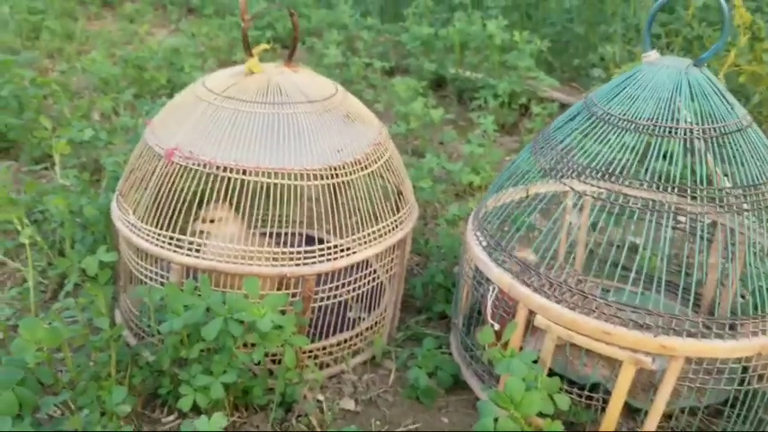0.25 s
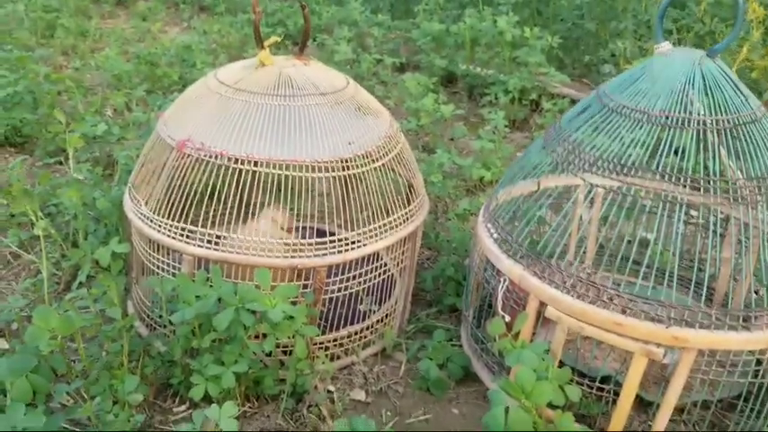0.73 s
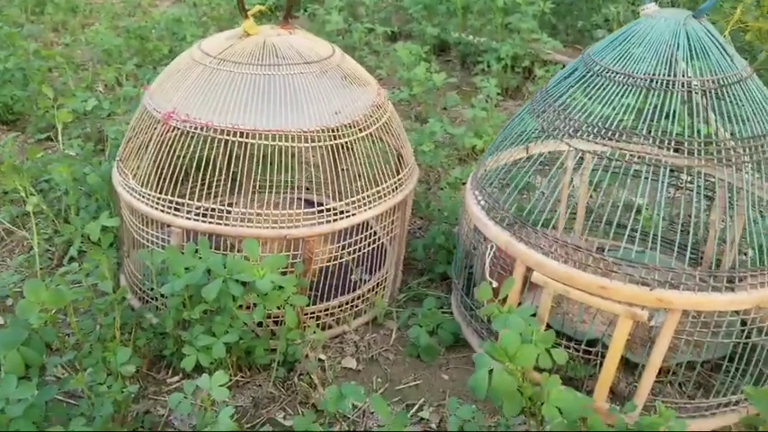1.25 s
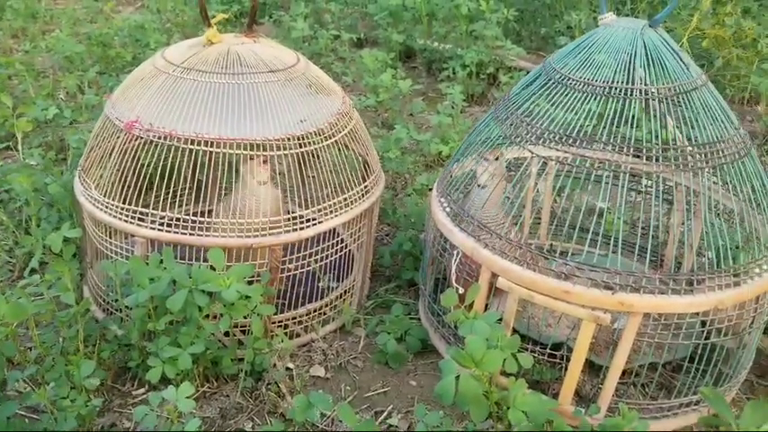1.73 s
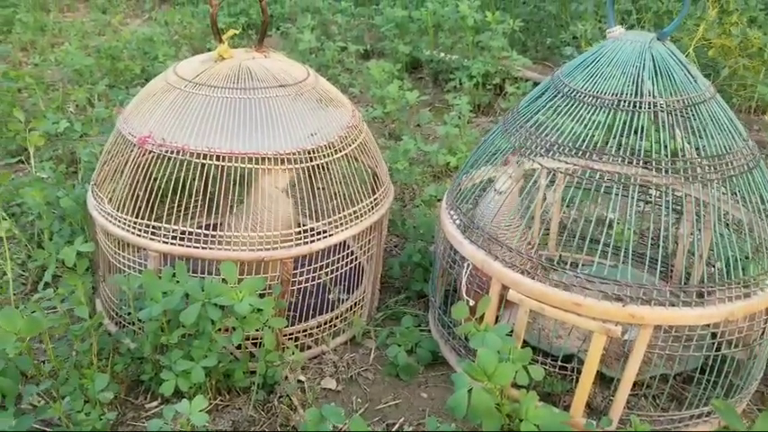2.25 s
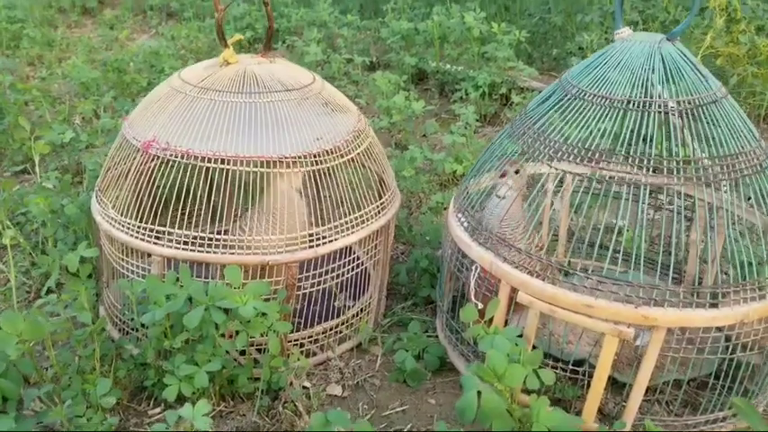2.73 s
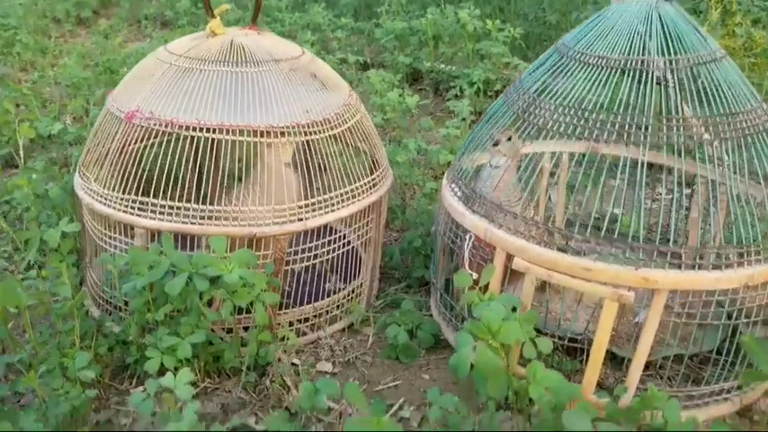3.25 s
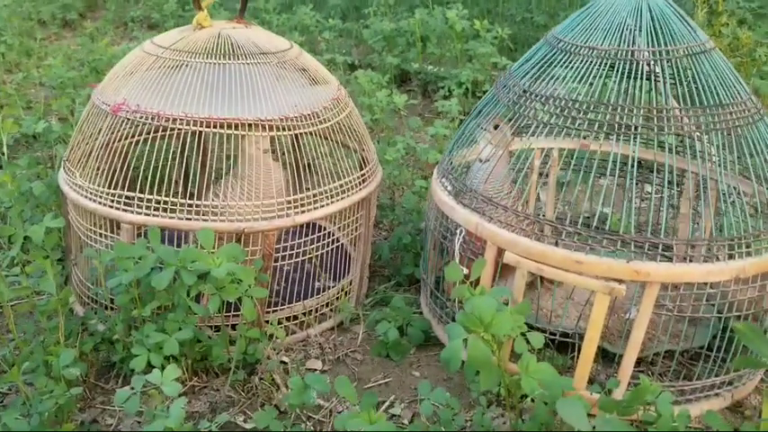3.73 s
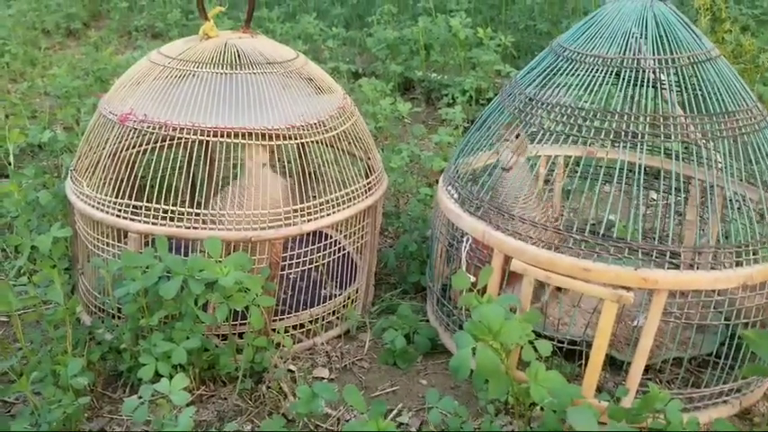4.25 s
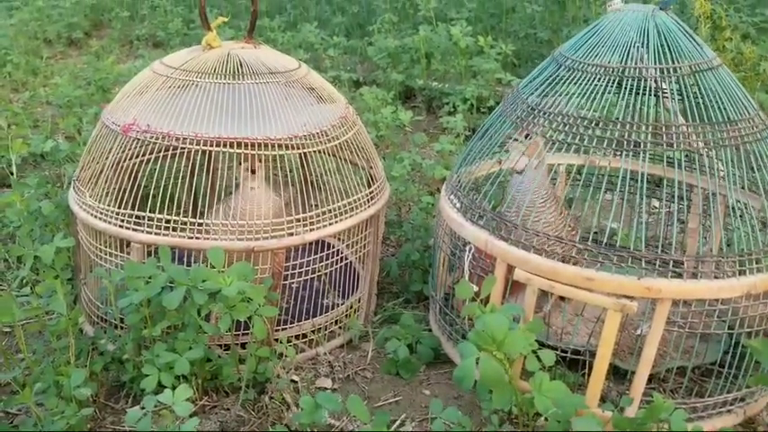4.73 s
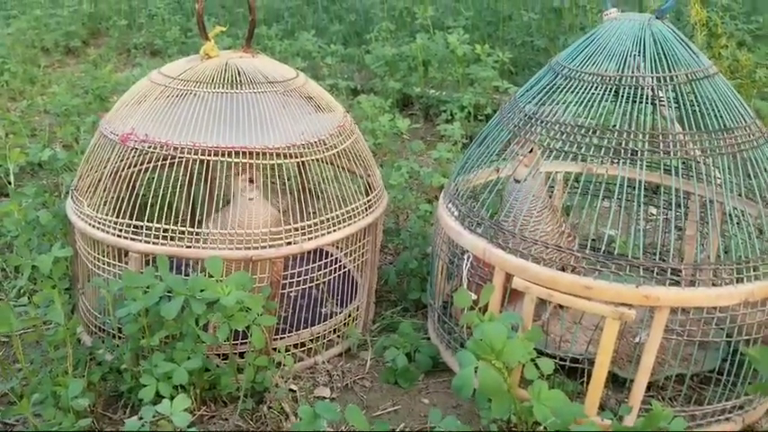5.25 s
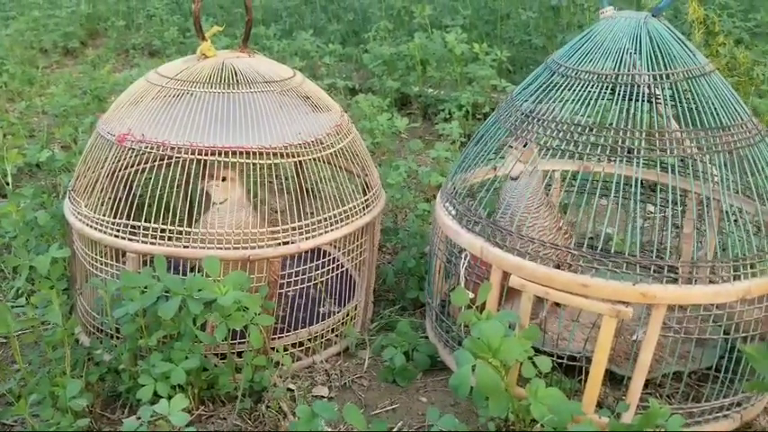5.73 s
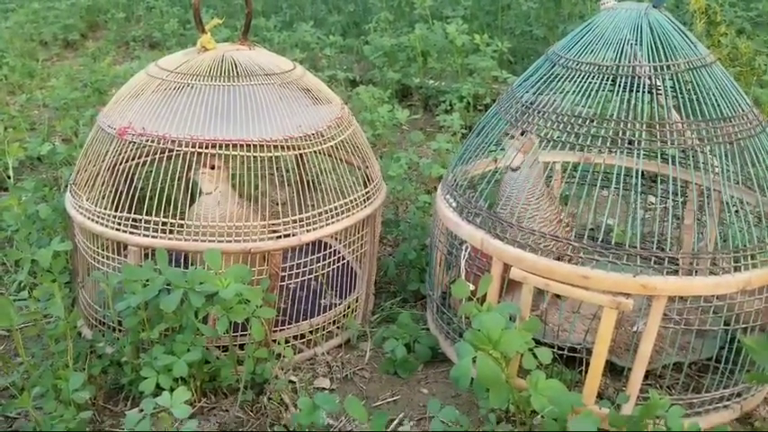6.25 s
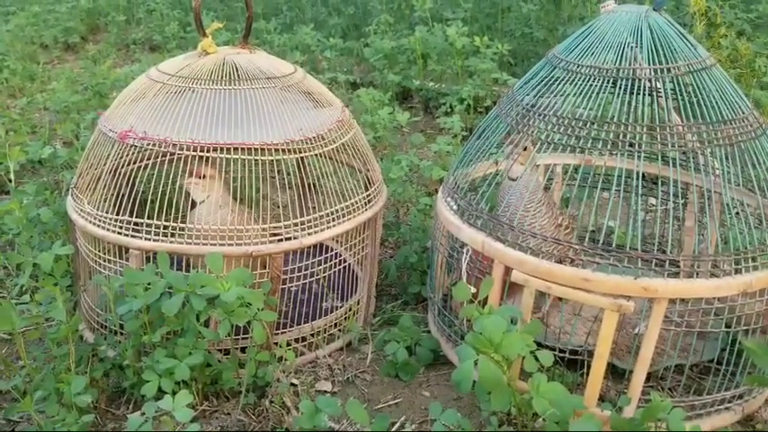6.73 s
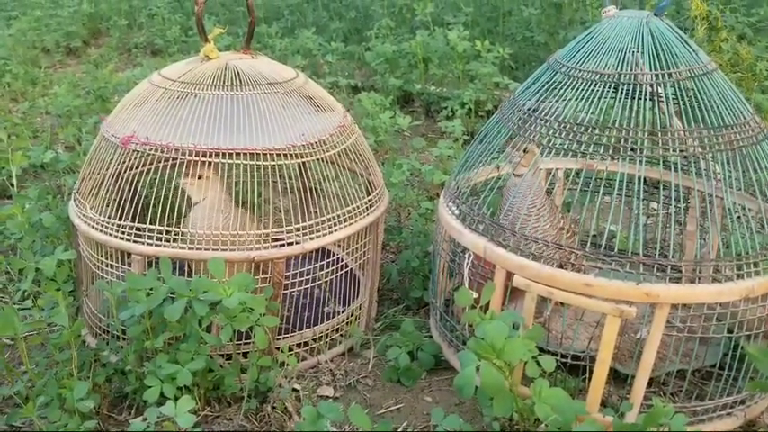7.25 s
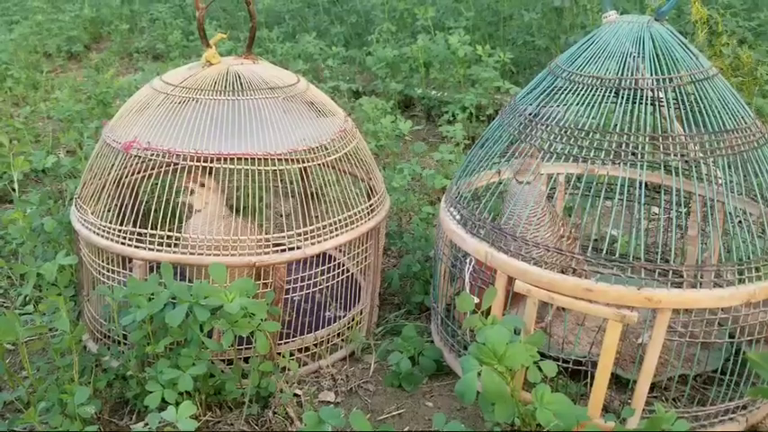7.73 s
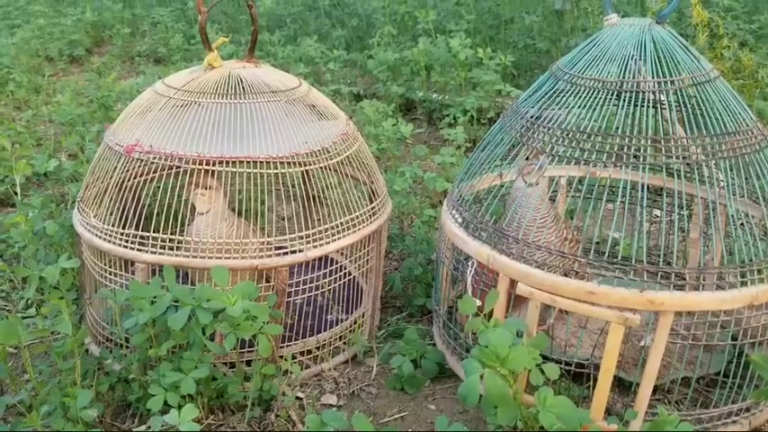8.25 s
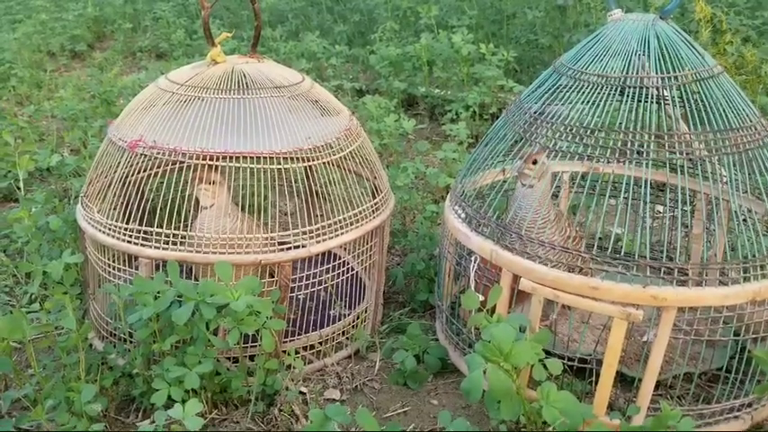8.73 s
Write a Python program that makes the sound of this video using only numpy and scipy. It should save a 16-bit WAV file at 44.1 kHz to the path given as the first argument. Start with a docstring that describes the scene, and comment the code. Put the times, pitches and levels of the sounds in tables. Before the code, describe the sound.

Soft knocks and whines open over a faint low rumble outdoors. Game birds in cages then break into a dense, shrill chorus near the microphone: sharp ringing notes, cracked falling whistles and rapid raspy clucks, with a high squeal recurring between them. The rhythm holds for several seconds before easing to a few separate whistles and squeals. The field gives back a slight echo.

```python
"""Ringing 'tee' notes, broken falling 'tar' notes and runs of hoarse chucks interlock, close by:
francolins calling from two cages in a field, joined by a thin breathy squeal. A bird's vocal
membrane whistles when it swings regularly and rasps when it swings chaotically.
Soft whines, dull knocks, low rumble and hiss lie underneath; the field returns a faint echo."""
import sys
import numpy as np
from scipy import signal
from scipy.fft import rfft, irfft, next_fast_len
from scipy.io import wavfile

SR = 44100
rng = np.random.default_rng(int(sys.argv[2]) if len(sys.argv) > 2 else 0)


def persist_wave(psi):
    """Save psi, clipped to +-1, as 16-bit WAV."""
    counts = np.round(np.clip(psi, -1, 1) * 32767).astype(np.int16)
    wavfile.write(sys.argv[1], SR, np.atleast_2d(counts).T)


N = 396018

# low background over time: time_s, bass_db, rumble_db
LOW_LEVELS = [(0.0, -50.5, -49.5), (1.1, -48.5, -59), (1.85, -60.5, -62), (2.37, -65.5, -69),
              (3.2, -60.5, -60.5), (3.62, -70.5, -68.5), (7.05, -74, -64), (7.5, -62, -62.5),
              (7.68, -62, -61.5), (8.9, -57.5, -61.5), (8.98, -65, -61)]
# background noise spectra: freq_hz, gain_db
BASS_SPECTRUM = [(20, -16), (38, -13.5), (52, 2.5), (75, -7.5), (130, -2.5), (200, -7), (400, -37),
                 (2000, -70.5)]
RUMBLE_SPECTRUM = [(20, -23.5), (80, -8.5), (140, -3.5), (240, 2), (330, -4), (450, -6.5), (700, -21.5),
                   (1500, -27), (3000, -36), (8000, -78)]
HISS_SPECTRUM = [(200, -6.5), (900, -2.5), (1600, 1.5), (2600, -4.5), (6000, -9), (7800, -2), (8600, -7.5),
                 (9500, -12), (12200, -17), (15500, -24.5)]
# hum lines: freq_hz, level_re_bass_db
HUM_LINES = [(52, -2.5), (104, 0)]
# echo decay: freq_hz, t60_s
FIELD_DECAY = [(300, .3), (1500, 1), (3000, 0.32), (6000, 0.53), (14000, 0.089)]
# double knocks: start_s, second_after_s, peak_db
KNOCK_PAIRS = [(.218, 0.027, -22), (.324, 0.02, -19.5), (.501, 0.0092, -22), (.694, 0.014, -23),
               (.748, 0.026, -24.5), (0.837, .011, -26), (1.059, 0.014, -24), (1.207, 0.019, -25),
               (2.952, 0.027, -30.5), (3.051, 0.032, -28.5), (3.206, 0.049, -29)]
# spells of fainter knocks: start_s, end_s
PATTER_SPELLS = [(.1, 1.2), (2.9, 3.35)]
# knock spectrum: freq_hz, gain_db
KNOCK_SPECTRUM = [(40, -13.5), (130, 0.5), (350, -3.5), (650, -5.5), (1100, -19), (2500, -32.5),
                  (6000, -34), (12000, -68)]
# nasal whines: start_s, end_s, pitch_hz, level_db, noise_share
WHINE_NOTES = [(.02, .39, 466, -41, .45), (1.02, 1.38, 385, -43, .7)]
# falling peeps: start_s, length_s, from_hz, to_hz, level_db
PEEP_NOTES = [(.695, .075, 2000, 1450, -50), (.80, .03, 2300, 1750, -55), (.77, .06, 1300, 900, -59),
              (8.37, .23, 2150, 1980, -63)]
# squeals: start_s, length_s, handover_after_s, pitch_hz, lower_db, upper_db, pan_db, bump_db
SQUEAL_NOTES = [(1.155, .15, 0.13, 3860, -15, -23.5, 10, -30.5),
                (2.08, 0.14, .022, 3880, -29.5, -28, -9, -40),
                (2.775, 0.17, 0.044, 3900, -22.5, -26, 0.5, -47),
                (3.42, .168, 0.11, 3974, -28, -31.5, 4.5, -48),
                (4.005, 0.18, .062, 4030, -28, -33.5, 4.5, -55.5),
                (4.579, 0.18, 0.075, 4020, -28, -28.5, 1, -58),
                (5.145, 0.18, 0.057, 3980, -25, -26, 5, -51.5),
                (5.821, 0.17, 0.048, 3990, -26, -29, -1, -54),
                (6.449, 0.17, .041, 4110, -22, -33.5, -3, -54),
                (6.985, 0.21, 0.16, 4018, -19.5, -29.5, 2.5, -50.5),
                (7.609, .208, .055, 4020, -20.5, -20.5, -5, -39),
                (8.203, 0.18, 0.06, 4044, -20, -23.5, -6.5, -49.5),
                (8.798, 0.19, .062, 4053, -20.5, -23, -4.5, -36.5)]
# vocal tract filters: freq_hz, gain_db
WHINE_SPECTRUM = [(300, -21), (800, -14), (1100, -16), (1450, -2), (1850, -7), (2600, -20.5), (4500, -22),
                  (6000, -18), (7000, -28.5), (11000, -17), (15000, -45.5)]
BEAK_OPEN = [(200, -52), (500, -20), (780, -24.5), (1100, -13.5), (1450, -12), (2000, -7.5), (2850, 1.5),
             (3600, -0.5), (4400, -7.5), (5800, -13.5), (7200, -21), (10500, -20.5), (15000, -25.5)]
BEAK_HALF_SHUT = [(200, -30.5), (500, -20), (780, -26), (1150, -13.5), (1550, 4), (2200, -17), (3000, -18),
                  (4300, -39.5), (5500, -18), (7500, -33), (15000, -31)]
SQUEAL_GAP = [(300, -25), (1000, -24.5), (1800, -16), (2600, -22), (3400, -21), (4000, 2.5),
              (4500, -2), (5200, -3), (6200, -17), (7500, -24), (12000, -22), (15500, -22.5)]
# chuck runs: start_s, count, spacing_ratio, top_hz, level_db, closing_chucks, last_fade_db
CHUCK_SERIES = [(1.733, 4, 1, 2485, -24.5, 1.05, -10.5), (2.48, 3, 0.97, 2897, -22.5, 1.6, -15),
                (3.021, 3, 1, 2962, -21, 1.72, -3), (3.565, 3, 1.04, 2965, -20.5, 1.59, -4.5),
                (4.13, 3, 1.005, 2957, -21, 1.58, -2.5), (4.675, 6, 1.005, 2928, -20.5, 1.65, -4),
                (5.708, 2, 0.98, 2780, -23, 1.47, 0), (6.262, 7, 0.99, 2890, -21, 1.5, -10.5)]
# broken notes: lock_s, stretch_ratio, pitch_hz, level_db, harmonic2_db
TAR_NOTES = [(1.471, 0.97, 2594, -15, 0), (2.274, 0.96, 2710, -13, -9), (2.807, 1.033, 2666, -11.5, -12),
             (3.353, 1.0, 2683, -11, -9), (3.922, 1.03, 2685, -11.5, -12), (4.466, 1.0, 2670, -10, -11.5),
             (5.509, 1.042, 2657, -8.5, -15.5), (6.054, 1.075, 2656, -7.5, -15)]
# ringing notes: lock_s, pitch_hz, sag_hz, level_db, harmonic2_db, upper_harmonics_db
TEE_NOTES = [(1.639, 2955, -5, -10, -9.5, -14.5), (2.174, 2968, 18, -13.5, -8.5, -20),
             (2.64, 2985, 9, -13, -7.5, -26), (3.16, 3002, -3.5, -11, -24.5, -18),
             (3.709, 2993, -8.5, -16, -18, -18), (4.273, 2987, 5, -13.5, -20.5, -20.5),
             (4.824, 2998, 6.5, -10.5, -31, -22.5), (5.361, 2980, 1, -8.5, -25.5, -23),
             (5.877, 2962, 45.5, -10, -18.5, -16), (6.428, 2945, 53, -9.5, -22.5, -13.5),
             (7.146, 2928, 30, -13, -15, -14.5), (7.792, 2926, 12, -9.5, -13, -14.5)]
# caller's head position: time_s, turn_fraction
HEAD_TURNS = [(2.6, 0.18), (3.7, 0.12), (4.8, 0.71), (5.9, 0.98), (7.1, 0.99), (7.8, 0.68)]
# microphone port colour: freq_hz, left_minus_right_db
PORT_BALANCE = [(100, -3), (450, -1.5), (1400, 2.5), (2500, 0.5), (4500, -1.5), (6000, -3), (8500, -0.5),
                (12000, 1), (15000, 3.5)]

LOCK_S, RELEASE_S = .003, .008  # a whistle locks in, breaks up


def amp(db):
    return 10 ** (np.asarray(db) / 20)


def unit_rms(x):
    return x / np.sqrt(np.mean(x ** 2) + 1e-20)


def at_freq(points, hz):
    """Interpolate over log frequency."""
    freq_hz, value = np.transpose(points)
    return np.interp(np.log(hz + 1), np.log(freq_hz + 1), value)


def colour(x, spectrum, bright_db=0):
    """Filter by a spectrum plus a treble shelf; rms 1."""
    hz = np.fft.rfftfreq(len(x), 1 / SR)
    shelf_db = bright_db * hz ** 4 / (hz ** 4 + 3280.0 ** 4)
    return unit_rms(irfft(rfft(x) * amp(at_freq(spectrum, hz) + shelf_db), len(x)))


def wobble(n, rate_hz):
    """Smooth random drift; rms 1."""
    size = next_fast_len(n + 4096)
    lowpass = np.exp(-(np.fft.rfftfreq(size, 1 / SR) / rate_hz) ** 2)
    return unit_rms(irfft(rfft(rng.standard_normal(size)) * lowpass, size))[:n]


def stereo_noise(spectrum, spread):
    """Coloured noise, partly shared by both microphones."""
    common = rng.standard_normal(N)
    return np.array([colour(common + spread * rng.standard_normal(N), spectrum) for _ in range(2)])


def gate(t, start_s, end_s, attack_s, release_s):
    return np.clip((t - start_s) / attack_s, 0, 1) * np.clip((end_s - t) / release_s, 0, 1)


def bell(t, centre, width):
    return np.exp(-((t - centre) / width) ** 2)


def phase_rad(hz):
    return 2 * np.pi * np.cumsum(hz) / SR


def place(mix, start_s, sound, pan_db=0, lag_ms=0):
    """Add to the mix; pan_db is left minus right, lag_ms delays the right."""
    size = next_fast_len(len(sound) + 128)
    delay = np.exp(-2j * np.pi * np.fft.rfftfreq(size, 1 / SR) * lag_ms / 1000)
    right = irfft(rfft(sound, size) * delay, size)[:len(sound)]
    part = mix[:, max(round(start_s * SR), 0):][:, :len(sound)]
    part += np.array([sound * amp(pan_db / 2), right * amp(-pan_db / 2)])[:, :part.shape[1]]


def head_turn(time_s, before, after):
    """Blend two values as the bird turns its head."""
    return before + (after - before) * np.interp(time_s, *np.transpose(HEAD_TURNS))


def tone(hz, harmonics_db, jitter, shimmer_db=0):
    """Regular swing: a harmonic stack; overtones shimmer as the head moves."""
    phase = phase_rad(hz * (1 + jitter * wobble(len(hz), 700)))
    stack = 0
    for k, db in enumerate(harmonics_db, 1):
        sway_db = shimmer_db * wobble(len(hz), 22) if k > 1 else 0
        stack += amp(db + sway_db) * np.sin(k * phase) * (k * hz < SR / 2)
    return np.sqrt(2) * stack


def rasp(hz, beak, bright_db, jitter, air, flutter):
    """Chaotic membrane swing: jittered pulses an octave down, air noise, fast flutter."""
    n = len(hz)
    phase = phase_rad(hz / 2 * (1 + jitter * wobble(n, 855)))
    pulses = unit_rms(sum(np.cos(k * phase) for k in range(1, 11)))
    source = pulses + air * rng.standard_normal(n)
    return colour(source * np.exp(flutter * wobble(n, 700)), beak, bright_db)


def background(pan_db=2, hiss_fade_db_per_s=1.17):
    """Bass with a wavering hum, soft rumble, and a thin fading hiss that dips briefly."""
    t = np.arange(N) / SR
    time_s, *levels_db = np.transpose(LOW_LEVELS)
    bass_gain, rumble_gain = (amp(np.interp(t, time_s, db)) for db in levels_db)
    hum = sum(amp(db) * tone(hz * (1 + .013 * wobble(N, 5.3)), [0], 0) for hz, db in HUM_LINES)
    bass = bass_gain * (stereo_noise(BASS_SPECTRUM, 1) + hum) * amp(-2.5)
    rumble = rumble_gain * stereo_noise(RUMBLE_SPECTRUM, 1.5) * amp(2 + 2.9 * wobble(N, 18))
    hiss_db = -56 - hiss_fade_db_per_s * t - 10 * bell(t, 2.3, .5)
    hiss = amp(hiss_db) * stereo_noise(HISS_SPECTRUM, 2.3)
    return (bass + rumble) * amp([[pan_db / 2], [-pan_db / 2]]) + hiss


def field_echo(x, near_db=-21, tail_db=-32):
    """Cage and ground scatter at once; plants and trees return a faint tail."""
    t = np.arange(SR * 3 // 4) / SR
    taps = rng.standard_normal((2, len(t))) * (rng.random((2, len(t))) < .06)
    hz, frame_s, bands = signal.stft(taps, SR, nperseg=256)
    decay = amp(-60 * frame_s / at_freq(FIELD_DECAY, hz)[:, None])
    tail = signal.istft(bands * decay, SR, nperseg=256)[1][:, :len(t)]
    near = taps * np.exp(-t / .0017)
    response = sum(amp(db) * path / np.linalg.norm(path, axis=1, keepdims=True)
                   for db, path in [(near_db, near), (tail_db, tail)])
    return signal.fftconvolve(x, response, axes=1)[:, :N]


def knocks(second_db=-3, patter_per_s=14, patter_db=-36.5):
    """Dead knocks without ring, in pairs amid a fainter patter."""
    out, t = np.zeros((2, N)), np.arange(2048) / SR
    hit_s = t[256]
    blows = []
    for start_s, after_s, db in KNOCK_PAIRS:
        blows += [(start_s, db), (start_s + after_s, db + second_db)]
    for start_s, end_s in PATTER_SPELLS:
        count = round(patter_per_s * (end_s - start_s))
        blows += [(at_s, patter_db) for at_s in rng.uniform(start_s, end_s, count)]
    for start_s, db in blows:
        scatter = .088 * rng.standard_normal(len(t)) * (t > hit_s) * np.exp(-t / .012)
        knock = colour((t == hit_s) + scatter, KNOCK_SPECTRUM)
        place(out, start_s - hit_s, amp(db) * knock / abs(knock).max(), pan_db=7, lag_ms=.5)
    return out


def bumps(lead_s=.013):
    """A soft, low, falling bump just before each squeal."""
    out, t = np.zeros((2, N)), np.arange(2048) / SR
    hz = 130 + 260 * np.exp(-t / .014)
    swell = np.sin(np.pi * np.sqrt(t / t[-1])) ** 3
    for start_s, *_, db in SQUEAL_NOTES:
        place(out, start_s - lead_s, amp(db) * swell * tone(hz, [0, -17], .068), pan_db=2, lag_ms=.4)
    return out


def peeps():
    """Faint falling peeps."""
    out = np.zeros((2, N))
    for start_s, length_s, from_hz, to_hz, db in PEEP_NOTES:
        hz = np.linspace(from_hz, to_hz, round(length_s * SR))
        place(out, start_s, amp(db) * np.hanning(len(hz)) * tone(hz, [0, -6, -16], jitter=.047))
    return out


def whines():
    """Soft nasal notes: an arching buzz plus noise, filtered by the throat."""
    out = np.zeros((2, N))
    for start_s, end_s, pitch_hz, db, noise_share in WHINE_NOTES:
        arch = np.sin(np.linspace(0, np.pi, round((end_s - start_s) * SR)))
        buzz = unit_rms(tone(pitch_hz * (.93 + .097 * arch), np.zeros(14), jitter=.03))
        source = (1 - noise_share) * buzz + noise_share * rng.standard_normal(len(arch))
        place(out, start_s, amp(db) * arch * colour(source, WHINE_SPECTRUM), pan_db=-1)
    return out


def squeals(rise_hz=108, upper_ratio=1.079, scoop_hz=45, hiss_db=-14, linger_db=-11):
    """A rising tone hands over to a higher one; air hisses through the same narrow gap."""
    out = np.zeros((2, N))
    for start_s, length_s, switch_s, pitch_hz, lower_db, upper_db, pan_db, _ in SQUEAL_NOTES:
        t = np.arange(-.015, length_s + .017, 1 / SR)
        n = len(t)
        first_push = .82 + .55 * np.exp(-np.abs(t - .02) / .02)
        swell = gate(t, 0, length_s, .022, .039) * first_push
        handover = np.clip((t - switch_s) / .007 + .5, 0, 1)
        flat_hz = rise_hz * np.clip(1 - t / switch_s, 0, 1) + 90 * np.exp(-np.abs(t) / .012)
        lower = tone(pitch_hz - flat_hz + (8 + 22 * handover) * wobble(n, 160), [0, -36, -38], .008)
        upper_hz = upper_ratio * pitch_hz - scoop_hz * np.exp(-np.abs(t - switch_s) / .0069)
        upper = tone(upper_hz + 14 * wobble(n, 70), [0, -33, -38], .002)
        voices = amp(lower_db) * (1 - handover + amp(linger_db) * handover) * lower
        voices += amp(upper_db) * handover * upper
        air = colour(rng.standard_normal(n), SQUEAL_GAP) * signal.windows.tukey(n, .45)
        air *= amp((lower_db + upper_db) / 2 + hiss_db)
        place(out, start_s + t[0], swell * voices * np.exp(.25 * wobble(n, 80)), pan_db, lag_ms=.005)
        place(out, start_s + t[0], air, pan_db=-1, lag_ms=-.02)
    return out


def chuck_beats(spacing_s=.092, hurry_s=.027, shut_ratio=.62, sink_per_chuck=.028, shut_db=-10.5):
    """A run starts loud and high, hurries, and sinks as the beak closes."""
    for start_s, count, spacing_ratio, top_hz, db, closing_chucks, fade_db in CHUCK_SERIES:
        for k in range(count):
            shut = 1 - np.exp(-(k / closing_chucks) ** 3)
            pitch_hz = top_hz * (1 - shut * (1 - shut_ratio + sink_per_chuck * k))
            yield start_s, pitch_hz, db + shut_db * shut + fade_db * (k / (count - 1)) ** 5
            start_s += spacing_ratio * (spacing_s - hurry_s * bell(k, 2.55, 1.3))


def chucks(arch_depth=.18, crest_db=2.5, slide_db=-4):
    """Short arched croaks; a hoarse whistle rings at the crest, then slides down."""
    out = np.zeros((2, N))
    for start_s, pitch_hz, db in chuck_beats():
        opening = np.clip((pitch_hz - 1900) / 950, 0, 1)
        t = np.arange(0, .056 * (.82 + .16 * opening), 1 / SR)
        along = t / t[-1]
        arch = np.abs(np.sin(np.pi * along ** .8))
        bend = 1.04 - arch_depth * (1 - arch)
        wide = rasp(pitch_hz * bend, BEAK_OPEN, -6, jitter=.055, air=.48, flutter=.27)
        # half-shut beak: far slower pulses
        narrow = rasp(.6 * pitch_hz * bend ** 2, BEAK_HALF_SHUT, 0, jitter=.05, air=.5, flutter=.3)
        rough = np.sqrt(opening) * wide + np.sqrt(1 - opening) * narrow
        slide_depth = (.23 + .75 * opening) * rng.uniform(.95, 1.2)
        slide = np.interp(t, [.024, .033, .052], [1, .75, .62]) ** slide_depth
        whistle_hz = pitch_hz * np.minimum(bend, 1) * slide
        whistle = tone(whistle_hz, [-7 + 7 * opening, -21, -30], jitter=.07 - .027 * opening)
        ring = amp(crest_db) * bell(along, .31, .19) + amp(slide_db) * bell(along, .77, .15)
        note = amp(db - 1) * (ring * whistle + arch ** 1.9 * rough)
        place(out, start_s, note, pan_db=-5 - 1.5 * opening, lag_ms=.01)
    return out


def tars(fall_per_s=2.9, lift=.07, scoop=.07, crack_db=-2, croak_db=-3, leak_db=-11, breath_db=-23):
    """Broken notes: rasp, short whistle, break, falling whistle, closing croak."""
    out = np.zeros((2, N))
    lead_s, break_s, resume_s, end_s, crack_s = .054, .028, .045, .09, .00399  # before stretch
    for lock_s, stretch, pitch_hz, db, harmonic2_db in TAR_NOTES:
        t = np.arange(-lead_s, end_s + .028, 1 / (SR * stretch))
        # forced notes (strong 2nd harmonic) start harder and stay hoarse
        force = np.clip((harmonic2_db + 10) / 10, 0, 1)
        falling_s = np.clip(t - resume_s, 0, end_s - resume_s)
        fade = amp(-210 * (1.5 - .32 * force) * np.minimum(falling_s, .025))
        whistles = 1.053 * gate(t, 0, break_s, LOCK_S, RELEASE_S)
        whistles += gate(t, resume_s, end_s, LOCK_S, RELEASE_S) * fade
        lead = bell(t, -lead_s * .51, .0135 + .0055 * force)
        starts = bell(t, -crack_s, crack_s) + bell(t, resume_s - crack_s, crack_s)
        stop = bell(t, break_s + .001, 1.1 * crack_s)
        croak = bell(t, end_s + .006, .008)
        ring = whistles + amp(leak_db) * (lead + (starts + croak) / 2)
        hoarse = lead + amp(crack_db) * (starts + stop) + amp(croak_db) * croak + amp(breath_db)
        # rasp lifts the pitch; it gives way as each whistle breaks up
        bend = 1 - fall_per_s * falling_s + lift * (lead + 2 * (starts + croak))
        bend -= scoop * (stop + bell(t, end_s, 2 * crack_s))
        hz = pitch_hz * bend
        top_db = -18.5 + 25 * np.log10(np.minimum(bend, 1))  # throat damps overtones as pitch falls
        harmonics_db = [0, harmonic2_db - 1.5, top_db - 6.5, top_db - 2.5, top_db - 9]
        clean = tone(hz, harmonics_db, jitter=.0024 + .03 * hoarse, shimmer_db=3)
        rough = rasp(hz, BEAK_OPEN, 8 + .6 * harmonic2_db,
                     jitter=.04 + .04 * force, air=.42 + .4 * force, flutter=.22)
        # period doubling dies while the whistle holds, leaving air
        air = colour(rng.standard_normal(len(t)), BEAK_OPEN, bright_db=5.3)
        held = np.clip((-20 * np.log10(hoarse) - 12) / 8, 0, 1)
        noise = np.sqrt(1 - held) * rough + np.sqrt(held) * air
        noise *= amp(-19.5 + .34 * (db + 10) + 5 * force) * hoarse ** (1 - .28 * force)
        note = amp(db) * ring * clean + noise * gate(t, t[0], t[-1], .003, .012)
        place(out, lock_s - lead_s * stretch, note, pan_db=head_turn(lock_s, -7.4, -4.8), lag_ms=-.052)
    return out


def tees(lead_s=.041, hold_s=.085, droop_db_per_s=28.5, break_db=-4, leak_db=-16, breath_db=-38):
    """Ringing notes: a rasp snaps into a near-steady whistle, which droops and breaks up."""
    out = np.zeros((2, N))
    t = np.arange(-lead_s, hold_s + .025, 1 / SR)
    lead = gate(t, t[0], LOCK_S, .008, LOCK_S) * (.71 + .4 * bell(t, -lead_s / 2, .013))
    whistle = gate(t, 0, hold_s, LOCK_S, RELEASE_S) * amp(-droop_db_per_s * t)
    ring = whistle + amp(leak_db) * lead
    hoarse = lead + amp(break_db) * bell(t, hold_s + .00067, .0086) + amp(breath_db) * whistle
    overshoot = np.minimum(.02 * np.exp(-t / .009), .045)
    end_drop = np.minimum(.06 * np.exp((t - hold_s) / .0045), .16)
    lead_arch = .03 * lead * np.cos(2 * np.pi * (t / lead_s + .5))
    bend = 1 + overshoot - end_drop + lead_arch
    for lock_s, pitch_hz, sag_hz, db, harmonic2_db, upper_db in TEE_NOTES:
        hz = pitch_hz * bend - sag_hz * np.clip(t / .051 - .9, -1, 1) + 4 * wobble(len(t), 45)
        harmonics_db = [0, harmonic2_db, upper_db - 1.5, upper_db, upper_db - 5]
        clean = tone(hz, harmonics_db, jitter=.00063 + .029 * hoarse, shimmer_db=3)
        # weak period doubling: lines between the harmonics
        doubling_db = -40 + .43 * (harmonic2_db + 11.5) + head_turn(lock_s, 0, -4.5)
        doubling = amp(doubling_db) * tone(hz / 2, [-5, -59, -6, -53, -11, -70, -7.5], jitter=.002)
        rough = rasp(hz, BEAK_OPEN, head_turn(lock_s, 13, 6.7), jitter=.055, air=.6, flutter=.25)
        rasp_db = -9 + .12 * (harmonic2_db + 16)
        note = amp(db) * (ring * (clean + doubling) + amp(rasp_db) * hoarse * rough)
        place(out, lock_s + t[0], note,
              pan_db=head_turn(lock_s, -10.3, -5.2), lag_ms=head_turn(lock_s, .03, .164))
    return out


def scene():
    """Birds and their echo over knocks, bumps and background."""
    birds = tees() + tars() + chucks() + squeals() + whines() + peeps()
    return birds + field_echo(birds) + knocks() + bumps() + background()


def record(dry, knee=.65, headroom=.24, cutoff_hz=15750):
    """Microphone port colour, soft overload on peaks, band limit."""
    size = next_fast_len(N + 2048)
    balance_db = at_freq(PORT_BALANCE, np.fft.rfftfreq(size, 1 / SR))
    ported = irfft(rfft(dry, size) * amp(np.array([balance_db, -balance_db]) / 2), size)[:, :N]
    linear = np.clip(ported, -knee, knee)
    limited = linear + headroom * np.tanh((ported - linear) / headroom)
    lowpass = signal.firwin(401, cutoff_hz, window=("kaiser", 8), fs=SR)
    return signal.oaconvolve(limited, lowpass[None], "same", axes=1)


dry = scene()
out = record(dry)
persist_wave(out)
```